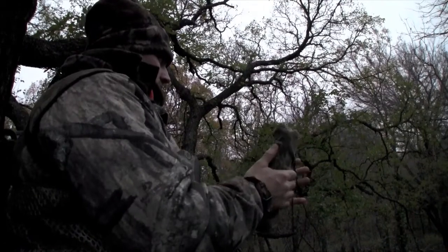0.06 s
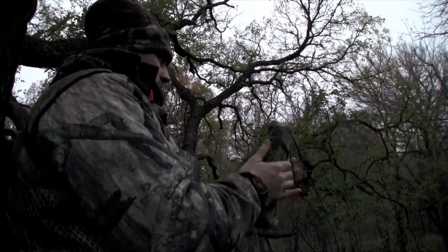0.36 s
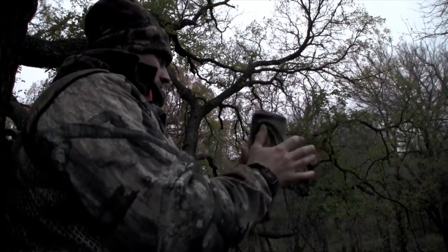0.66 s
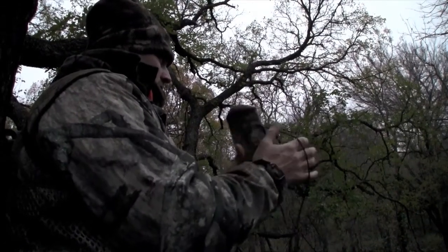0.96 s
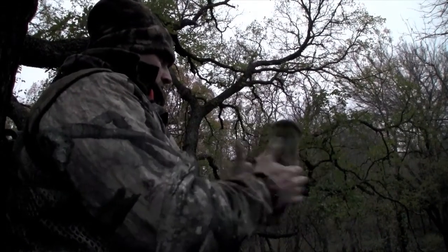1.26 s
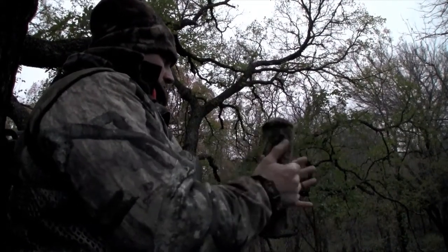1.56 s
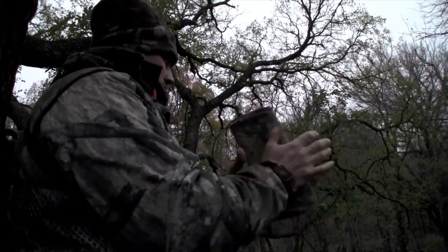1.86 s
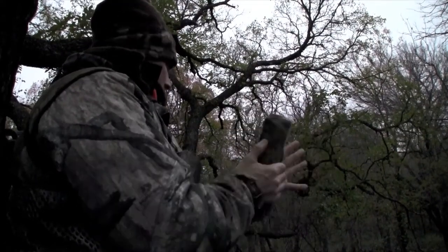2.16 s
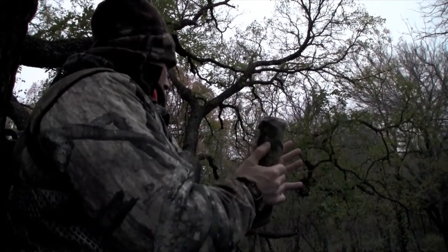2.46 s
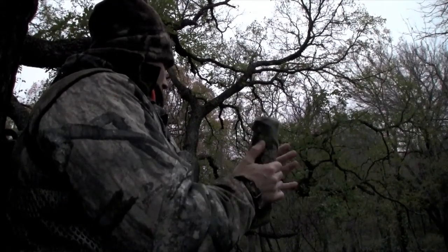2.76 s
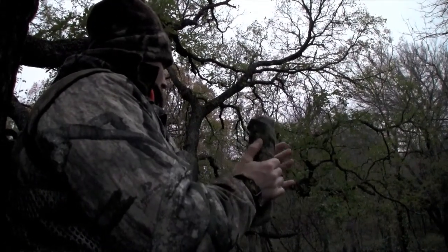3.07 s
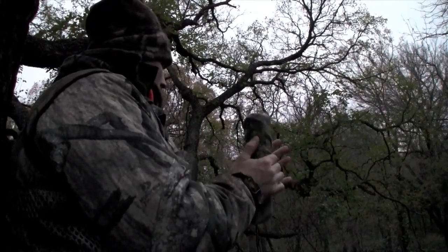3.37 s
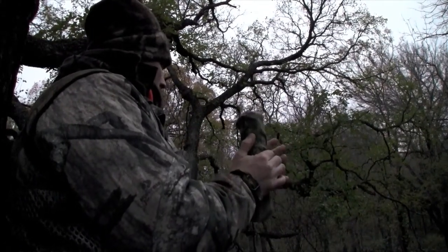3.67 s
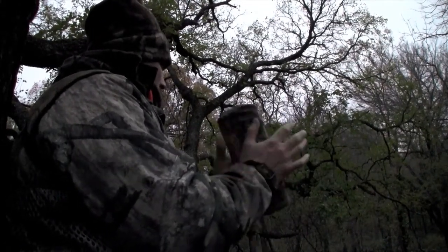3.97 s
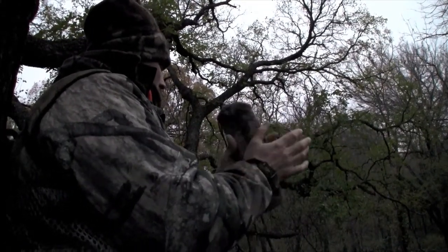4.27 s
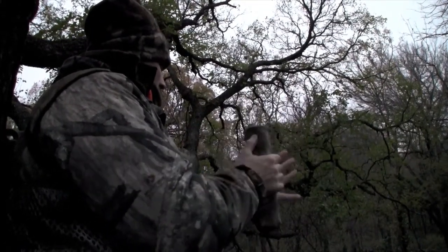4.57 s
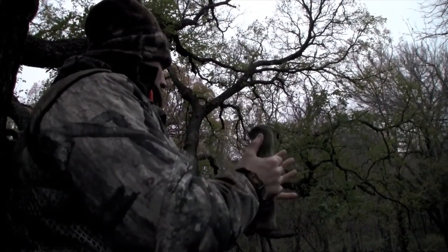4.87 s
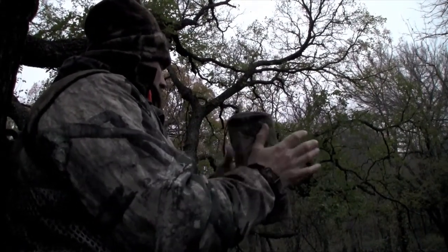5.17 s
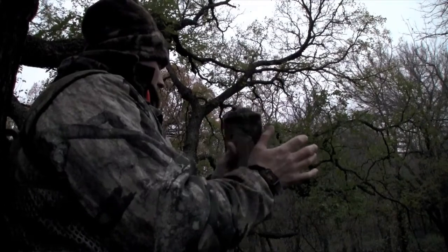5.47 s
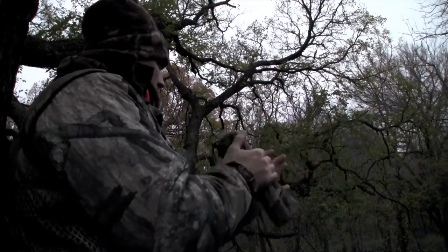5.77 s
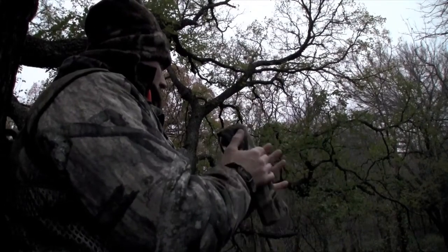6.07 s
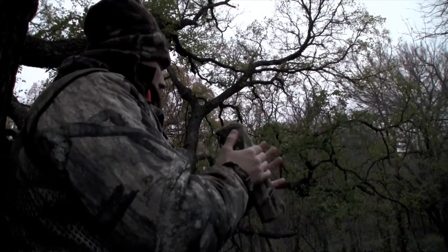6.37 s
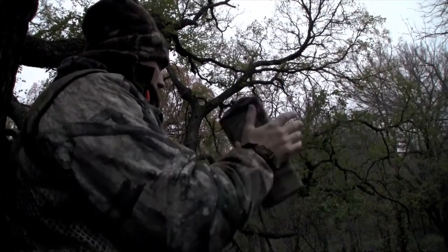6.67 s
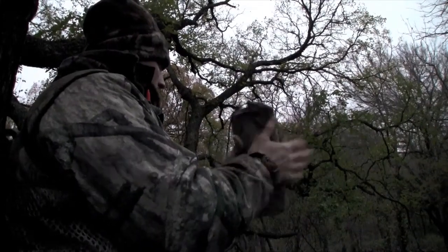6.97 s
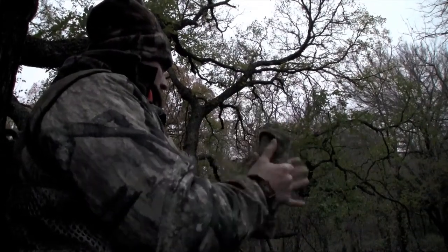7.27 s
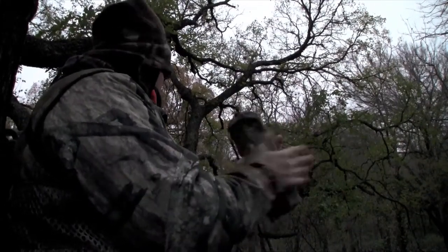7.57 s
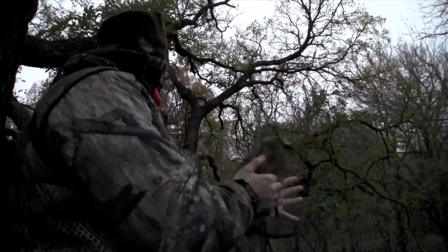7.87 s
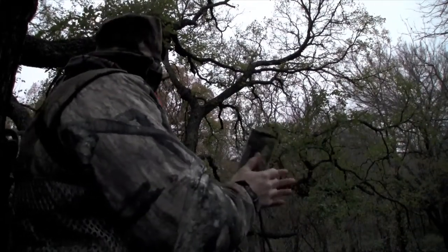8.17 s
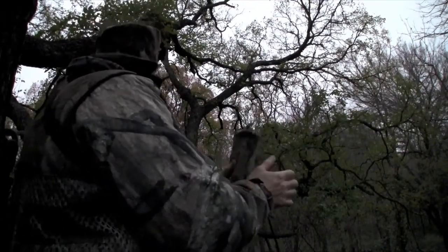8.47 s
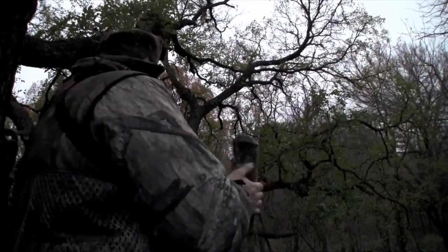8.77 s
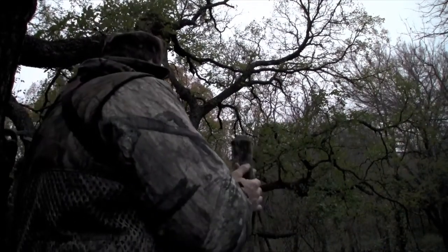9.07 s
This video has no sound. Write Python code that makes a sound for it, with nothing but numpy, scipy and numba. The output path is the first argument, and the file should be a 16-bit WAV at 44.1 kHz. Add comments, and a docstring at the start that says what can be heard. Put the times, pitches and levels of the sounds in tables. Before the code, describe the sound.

Close bursts of sharp clicking clatter from a deer rattle bag worked between the palms, with a faint echo among trees.

```python
"""Hard rods clack in bursts inside a rattle bag, a cloth sleeve worked by hand to imitate sparring deer.
Rolled and slapped between the palms, the rods rub, tumble and snap over each other, ringing briefly.
The trees return a faint echo over a distant rush of air; near the end a body turns with a soft rumble.
One close microphone feeds the left channel. The first clacks of a burst overload it until the
gain control (an automatic volume knob) turns the sound down."""
import sys
import numpy as np
from scipy import signal
from scipy.fft import rfft, irfft
from scipy.io import wavfile
from scipy.ndimage import uniform_filter1d, minimum_filter1d
from numba import njit

SR = 44100
rng = np.random.default_rng(int(sys.argv[2]) if len(sys.argv) > 2 else 0)


def write(x):
    x = np.atleast_2d(x).T
    wavfile.write(sys.argv[1], SR, np.round(np.clip(x, -1, 1) * 32767).astype(np.int16))


N = 401751
T = np.arange(N) / SR


def undb(db):
    """Turn decibels into a number to multiply a sound by."""
    return 10 ** (np.asarray(db) / 20)


def unit(x):
    """Scale a sound to an average strength (rms) of 1."""
    return x / np.sqrt(np.mean(x ** 2) + 1e-18)


def fade(t, t60):
    """A dying curve that loses 60 dB in t60 seconds."""
    return np.exp(-np.log(1000) * t / t60)


def noise(points, size):
    """Noise of strength 1, its tone shaped by (frequency [Hz], level [dB]) points."""
    hz, db = np.transpose(points)
    freqs = np.maximum(np.fft.rfftfreq(size, 1 / SR), 1)
    shape = undb(np.interp(np.log(freqs), np.log(hz), db))
    return unit(irfft(rfft(rng.standard_normal(size)) * shape, size))


def wander(rate_hz):
    """A slow random drift, about 1 in size."""
    step = int(SR / rate_hz)
    stairs = np.repeat(rng.standard_normal(N // step + 1), step)
    return unit(uniform_filter1d(stairs, step)[:N])


def add(track, at_s, sound):
    """Mix a sound into a track at the given time."""
    i = int(np.clip(at_s * SR, 0, len(track) - 1))
    track[i:i + len(sound)] += sound[:len(track) - i]


def running_max(x, width, origin=0):
    """The highest value in a sliding window of width samples."""
    return -minimum_filter1d(-x, width, origin=origin)


# Tone of the amplifier's hiss: (frequency [Hz], relative level [dB])
HISS_SPECTRUM = [(30, 10), (200, 10.5), (1000, 3), (3000, 5), (6500, 0), (7900, -1), (9000, -5),
                 (15500, -4)]
def amplifier_hiss(level_db):
    """The microphone's amplifier adds a faint, steady hiss."""
    return undb(level_db) * noise(HISS_SPECTRUM, N)


# Tone of the distant air in the woods: (frequency [Hz], relative level [dB])
AIR_SPECTRUM = [(25, -30.5), (60, -24), (115, -3), (230, -5.5), (400, -2.5), (520, -4.5), (750, 1),
                (1040, -4.5), (1500, -14), (2100, -22), (5000, -44), (16000, -73.5)]
def distant_air(level_db=-41, swell_db=.7):
    """A low, even rush from far away that barely swells."""
    swell = swell_db * wander(rate_hz=3)
    return noise(AIR_SPECTRUM, N) * undb(level_db + swell)


def seat_rumble(at_s=8.49, swell_s=0.12, level_db=-36):
    """A soft rumble as the body turns on its seat."""
    rumble = noise([(20, -6), (70, 3.0), (130, -5.5), (300, -14), (2000, -81)], N)
    return undb(level_db) * rumble * np.exp(-((T - at_s) / swell_s) ** 2)


def opening_echo(level_db=-29, t60=0.56):
    """At the start, the echo of a burst is already dying away among the trees."""
    return undb(level_db) * sleeve(noise(CRACK_SPECTRUM, N)) * fade(T, t60)


def tree_echo(x, near_db=-22, near_t60=0.13, far_db=-38, far_t60=0.74, twig_db=3, twig_t60=0.51):
    """The nearest trunk and branches scatter the clatter at once; the wood beyond answers late."""
    t = np.arange(int(1.5 * SR)) / SR
    near, trunks, twigs = rng.standard_normal((3, len(t)))
    near = near * fade(t, near_t60) * (t > .008)
    # trunks return the middle tones, twigs the high ones, which die sooner
    trunks = signal.sosfilt(signal.butter(2, 2600, fs=SR, output="sos"), trunks)
    twigs = signal.sosfilt(signal.butter(1, [3700, 7200], "band", fs=SR, output="sos"), twigs)
    far = trunks * fade(t, far_t60) + undb(twig_db) * twigs * fade(t, twig_t60)
    far *= np.minimum(t / 0.042, 1)  # builds up over 42 ms
    echo = undb(near_db) * near / np.linalg.norm(near) + undb(far_db) * far / np.linalg.norm(far)
    return signal.oaconvolve(x, echo)[:N]


def sleeve(x, low_hz=680, high_hz=7900, unfiltered_db=-20):
    """Thin rods give off little bass, and the cloth soaks up most of the highest tones."""
    thin = signal.sosfilt(signal.butter(2, low_hz, "high", fs=SR, output="sos"), x)
    muffled = signal.sosfilt(signal.butter(8, high_hz, fs=SR, output="sos"), thin)
    return muffled + undb(unfiltered_db) * thin


def rub(level_db=-24, swell_s=0.013, tone_hz=1787, follow=.45, layers=12):
    """Before each roll the pressed rods slide with a dull, swelling scrape until they give way."""
    lead_in = np.arange(-(SR // 8), 0) / SR
    pressure, scrape = np.zeros(N), np.zeros(N)
    for at_s, _, start_db, _, _ in ROD_ROLLS:
        strength = undb(level_db + follow * start_db)  # a louder roll gets a louder rub
        add(pressure, at_s + lead_in[0], strength * np.exp(lead_in / swell_s))
    for _ in range(layers):
        catches = np.zeros(N)
        catches[rng.integers(N, size=600)] = rng.standard_normal(size=600)
        scrape += signal.oaconvolve(catches, clack(tone_hz))[:N]
    return pressure * unit(scrape)


def jostle(clacks, level_db=-7, reach_s=0.018, scatter_db=3, tone_hz=2600, layers=24):
    """Between clacks that follow closely, the rods keep grinding and ticking against each other."""
    reach = int(reach_s * SR)
    power = np.abs(uniform_filter1d(clacks ** 2, size=200))
    # the push of the hands bridges short gaps only, so a lone clack stays clean
    bridged = minimum_filter1d(running_max(power, reach), reach)
    motion = np.sqrt(np.abs(uniform_filter1d(bridged - power, size=130)))
    ticks = np.zeros(N)
    for _ in range(layers):
        touches = np.zeros(N)
        touches[rng.integers(N, size=130)] = undb(scatter_db * rng.standard_normal(size=130))
        ticks += signal.oaconvolve(touches, clack(tone_hz))[:N]
    return undb(level_db) * motion * unit(ticks)


def tilt_to(spectrum, tone_hz):
    """Soft hits favour low tones, hard hits high ones: pick the tilt that best centres on tone_hz."""
    hz = np.linspace(0, SR / 2, len(spectrum))
    height = np.log(np.clip(hz, 800, 8000) / tone_hz)
    slopes = np.linspace(-4, 3, 22)[:, None]
    tilts = np.exp(slopes * height - height ** 2)
    power = np.abs(tilts * spectrum) ** 2
    balance = power @ height / power.sum(1)
    return spectrum * tilts[np.argmin(np.abs(balance))]


# Tones at which the rods ring: (frequency [Hz], relative level [dB], time to fade by 60 dB [s])
ROD_TONES = [(615, -17.5, 0.01), (834, -23.5, 0.1), (1068, -7, 0.0091), (1248, -13, 0.054),
             (1433, -7, 0.025), (1550, -12.5, 0.039), (1802.5, 1, 0.028), (1937, -1, 0.017),
             (2266, 0.5, 0.027), (2377, -5, 0.0084), (2605, 0.5, 0.021), (2842, 7, 0.0045),
             (3051, 4, 0.017), (3360, -5.5, 0.022), (3941, 0.5, 0.021), (4241, 1, 0.026),
             (4970, -0.5, 0.004), (5322, 0.5, .014), (5615, 3.5, 0.0044), (5800, -12, 0.0054),
             (6710, -17, 0.004), (8050, -20, 0.018)]
# Tone of the brief crack as rods meet: (frequency [Hz], relative level [dB])
CRACK_SPECTRUM = [(60, -27.5), (250, -11), (600, -9), (1300, 1.5), (2800, 5), (5500, -0.5), (7800, -13.5),
                  (9500, -8), (16000, -43.5)]
def clack(tone_hz, detune=.05, crack_db=-2, crack_t60=0.02, bounce=0.53, bounce_s=.0078, bounces=12):
    """One hit: the rods ring, crack briefly and bounce within milliseconds."""
    size, onset = 1024, 220  # samples in the whole clack and in its first 5 ms
    t = np.arange(size) / SR
    hz, db, t60 = np.transpose(ROD_TONES)[:, :, None]
    # rods differ in length, and the spot that is hit decides which tones answer
    pitch, push = rng.standard_normal((2, len(ROD_TONES), 1))
    waves = np.sin(2 * np.pi * hz * (1 + detune * pitch) * t)
    ring = (push * undb(db) * fade(t, t60) * waves).sum(0)
    ring /= ring[:onset].std()
    # the blow runs through the bundle as smaller contacts; hard, bright blows bounce least
    rebound = bounce * undb(2 * rng.standard_normal()) * min(2400 / tone_hz, 1) ** 2
    lags = (np.arange(bounces) + rng.random(bounces)) / bounces
    signs = rng.choice([-1, 1], bounces)
    contacts = np.zeros(size)
    contacts[0] = 1
    contacts[1 + (lags * bounce_s * SR).astype(int)] += rebound * signs * (1 - lags / 2)
    # every contact makes a crack of its own
    crack_power = signal.fftconvolve(contacts ** 2, fade(t, crack_t60) ** 2)[:size]
    cracks = np.sqrt(np.abs(crack_power)) * noise(CRACK_SPECTRUM, size)
    sound = signal.fftconvolve(ring, contacts)[:size] + undb(crack_db) * cracks
    sound = irfft(tilt_to(rfft(sound, 2 * size), tone_hz))[:size]
    return sound / sound[:onset].std()


def tumble(length_s, start_db, end_db, tone_hz, gap_s=.0125, stray=.25, max_clacks=8,
           scatter_db=2, scatter_octaves=.15, octaves_per_db=0.0364):
    """One roll: rods tumble over each other at an uneven pace while the palms press or ease off."""
    out = np.zeros(SR // 4)
    gaps = int(np.clip(np.ceil(length_s / gap_s), 1, max_clacks - 1))
    middle_db = (start_db + end_db) / 2
    for k, (slip, force, tone) in enumerate(rng.standard_normal((max_clacks, 3))):
        progress = np.clip((k + stray * slip * (0 < k < gaps)) / gaps, 0, 1)
        db = start_db + (end_db - start_db) * progress + scatter_db * force
        octaves = octaves_per_db * (db - middle_db) + scatter_octaves * tone  # harder is brighter
        sound = undb(db) * clack(tone_hz * 2 ** octaves)
        if k <= gaps:
            add(out, progress * length_s, sound)
    return out


# Quick runs of clacks:
# (time [s], length [s], relative start level [dB], relative end level [dB], centre of the tone [Hz])
ROD_ROLLS = [(0.589, 0.019, 7.5, 12, 2950), (0.63, 0.035, 0, 4, 2450), (0.911, 0.033, -25, 0, 1680),
             (1.171, 0.011, 8, 5.5, 3400), (1.284, 0.029, 14.5, 15.5, 2470), (1.333, 0.019, 2.5, -13, 2150),
             (1.391, .034, 11, 13, 2860), (1.451, 0.041, 5, 18.5, 2500), (1.514, 0.043, 16, 9.5, 2440),
             (1.813, .015, 18.5, 20.5, 2620), (1.848, 0.037, 14.5, 10, 2420), (2.197, .016, 19.5, 21, 3060),
             (2.22, .024, 21, 22, 2620), (2.251, .022, 14.5, -1.5, 2600), (4.014, 0.038, -3.5, 14.5, 2810),
             (4.219, 0.0072, 8.5, 11, 2730), (4.42, 0.027, -15.5, -5, 2510), (4.471, 0.032, 2, 12.5, 2850),
             (4.576, 0.034, 6.5, 12, 2840), (4.712, 0.021, 17, 7, 2930), (5.124, .027, -9.5, -16, 2040),
             (5.16, 0.014, 3, 15, 2595), (5.368, 0.015, 10, 17, 2980), (5.464, 0.0076, 0.5, 6.5, 2860),
             (5.526, 0.013, -12, -5, 2290), (5.774, 0.033, 6, 24, 3270), (5.872, .032, 2.5, 8.5, 2670),
             (6.545, 0.034, -20, 12, 2860), (6.593, 0.062, 11.5, 10, 2590), (7.135, 0.0086, -5, 17, 2240),
             (7.158, 0.037, 12.5, 18.5, 2230), (7.268, 0.013, 17.5, 5.5, 2670),
             (7.332, .031, 6.5, 17, 2790), (7.496, 0.013, 16.5, 10, 2180), (7.685, 0.067, -3, 11.5, 2550),
             (7.785, 0.048, -4.5, 0, 2540), (7.847, 0.032, 9, 0, 2540), (7.895, 0.017, 19, 27.5, 2760),
             (7.923, .031, 15.5, 12, 2500), (7.979, .011, 14.5, 15, 2400), (8.014, 0.039, -4, -4.5, 2400),
             (8.286, 0.0056, -5.5, 0, 2490), (8.352, .012, -6.5, 0.5, 2546), (8.42, 0.029, -8, -9.5, 2880),
             (8.513, 0.0065, -4.5, 2, 2750), (8.557, 0.032, -6.5, 0, 2530),
             (8.627, 0.018, -16, -14.5, 2180), (8.731, 0.016, 7, 3, 2880), (8.789, 0.017, 0, 3, 2390),
             (8.859, 0.04, -11, 13.5, 2630), (8.912, 0.044, 11, -10.5, 2100)]
def rolls():
    """Each push of the palms sets the rods tumbling."""
    out = np.zeros(N)
    for at_s, length_s, start_db, end_db, tone_hz in ROD_ROLLS:
        add(out, at_s, tumble(length_s, start_db, end_db, tone_hz))
    return out


# Single clacks: (time [s], relative level [dB], centre of the tone [Hz])
ROD_SNAPS = [(0.177, -6, 1600), (0.446, -20, 2080), (0.572, -4.5, 2240), (0.698, -7.5, 1850),
             (0.763, -4.5, 1720), (0.818, -3.5, 2380), (0.973, 18.5, 2165), (1.135, -2, 3000),
             (1.149, 13, 3930), (1.251, -7, 1680), (1.364, 3, 2190), (1.605, -7.5, 1230),
             (1.657, -9.5, 2370), (1.672, -6.5, 1900), (1.801, -12, 2160), (1.862, 24.5, 2540),
             (1.918, 14, 2450), (2.29, 7, 2950), (2.378, -13, 1910), (2.423, -3, 1890), (4.071, 12, 3000),
             (4.336, -16.5, 2260), (4.553, 2.5, 2470), (4.659, 14.5, 4550), (4.683, 22, 2500),
             (5.208, 15, 3380), (5.265, 0.5, 1800), (5.405, 6.5, 2200), (5.439, 4, 2970), (5.843, 17, 3500),
             (6.902, -16.5, 1560), (7.234, -11, 1990), (7.476, 0.5, 2400), (7.625, -13.5, 1900),
             (7.658, 5.5, 3270), (7.841, 16.5, 4700), (8.086, 16.5, 3510), (8.11, 3, 4030),
             (8.187, -10.5, 3030), (8.387, -7, 3400), (8.41, 0.5, 3800), (8.469, -11, 3200),
             (8.591, 11.5, 3200), (8.657, -4.5, 4100), (8.678, 1.5, 3350), (8.837, 1.5, 3500),
             (8.903, 20.5, 4160), (9.067, -13, 1214)]
def snaps():
    """One rod snaps over another and gives a single clack."""
    out = np.zeros(N)
    for at_s, db, tone_hz in ROD_SNAPS:
        add(out, at_s, undb(db) * clack(tone_hz))
    return out


def scene(left_hiss_db=-55, right_hiss_db=-63, leak_db=-57, overload_db=27):
    """The microphone is on the left; the right channel carries only hiss and a slight leak."""
    clacks = snaps() + rolls()
    bag = sleeve(clacks + jostle(clacks) + rub())
    sound = bag + tree_echo(bag) + opening_echo() + distant_air() + seat_rumble()
    # the hardest clacks overload the microphone's amplifier, which rounds off their peaks
    mic = undb(overload_db) * np.tanh(sound / undb(overload_db))
    left = mic + amplifier_hiss(left_hiss_db)
    right = undb(leak_db) * mic + amplifier_hiss(right_hiss_db)
    return np.array([left, right])


@njit
def gain_control(peak_db, start_db, limit_db, attack, release):
    """Volume change in dB: dives while peaks are over the limit, then climbs back at a steady rate."""
    out, gain_db = np.empty(len(peak_db)), start_db
    for i in range(len(peak_db)):
        over_db = peak_db[i] + gain_db - limit_db
        gain_db = gain_db - attack * over_db if over_db > 0 else min(0., gain_db + release)
        out[i] = gain_db
    return out


def record(dry, start_db=-17., limit_db=-6.5, attack_s=0.0076, release_db_per_s=95, hold_s=0.0064,
           ceiling=0.87, clip_hardness=7, noise_db=-78, top_hz=16100):
    """Gain control starts low and turns both channels up and down; peaks too quick for it are clipped."""
    hold = int(hold_s * SR) | 1  # an odd number of samples
    peak_db = 20 * np.log10(running_max(np.abs(dry[0]), hold, origin=hold // 2) + 1e-9)
    gain_db = gain_control(peak_db, start_db, limit_db, 1 / (attack_s * SR), release_db_per_s / SR)
    x = dry * undb(gain_db)
    # the recorder's own faint noise, on the left
    x[0] += undb(noise_db) * noise([(25, 1), (400, -16), (2000, -20.0), (16000, -24.5)], N)
    clipped = x / (1 + np.abs(x / ceiling) ** clip_hardness) ** (1 / clip_hardness)
    treble_cut = signal.ellip(8, .2, 70, top_hz, fs=SR, output="sos")
    return signal.sosfilt(treble_cut, clipped)


dry = scene()
out = record(dry)
write(out)
```